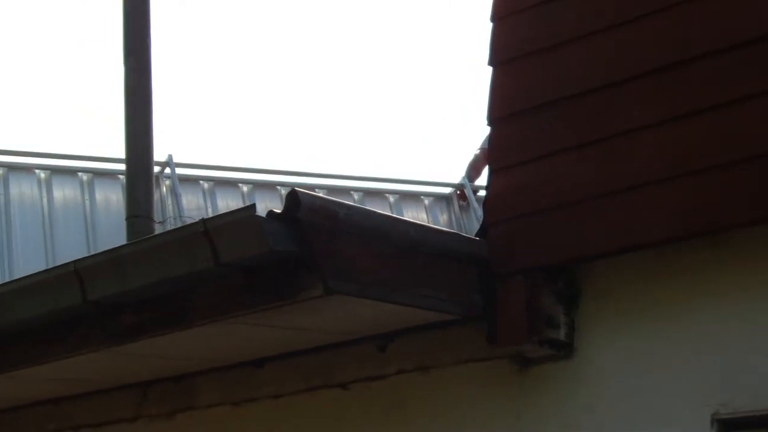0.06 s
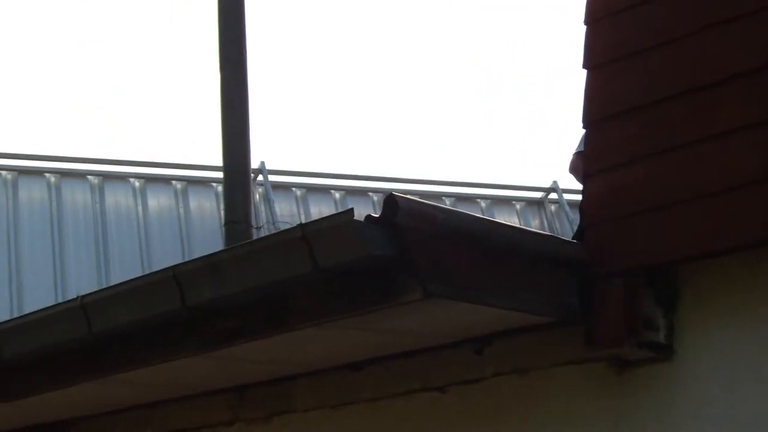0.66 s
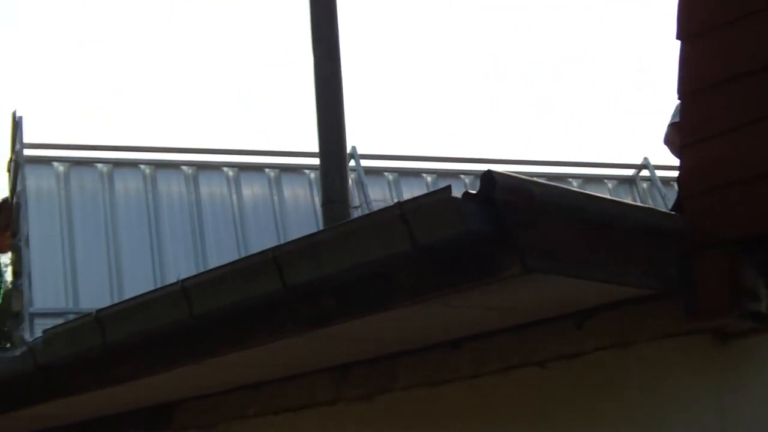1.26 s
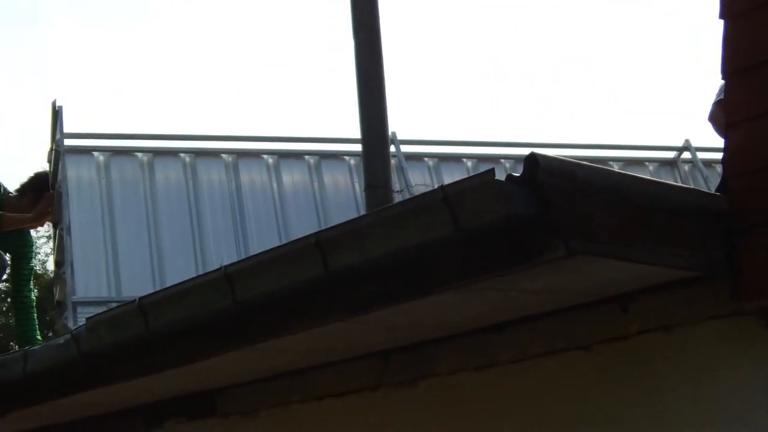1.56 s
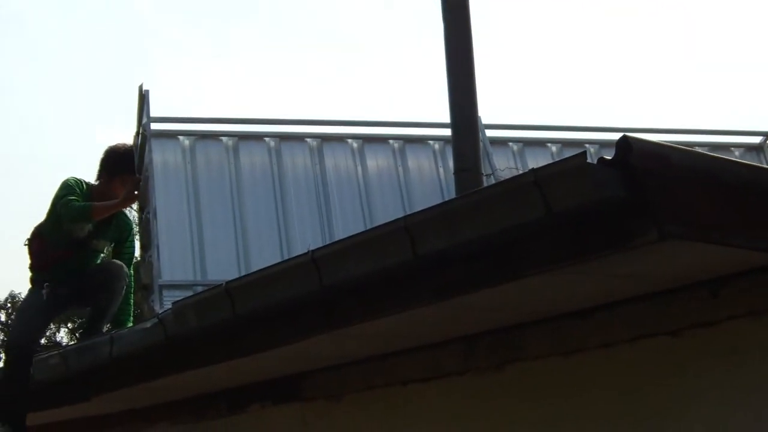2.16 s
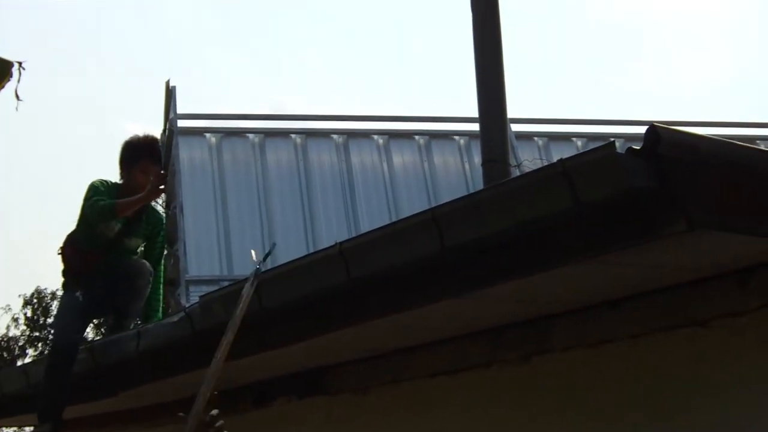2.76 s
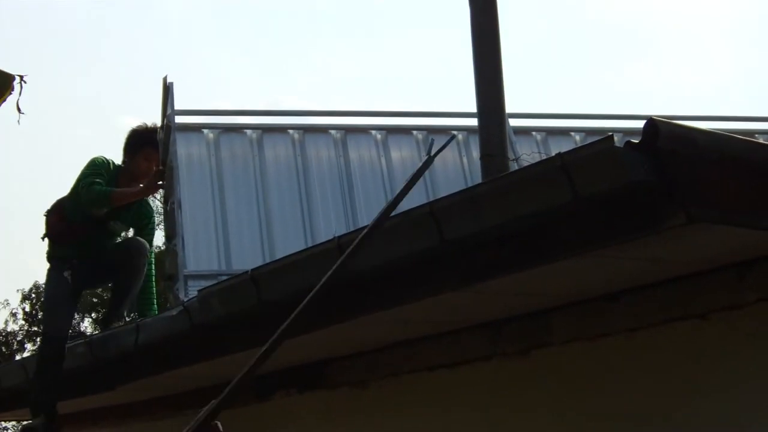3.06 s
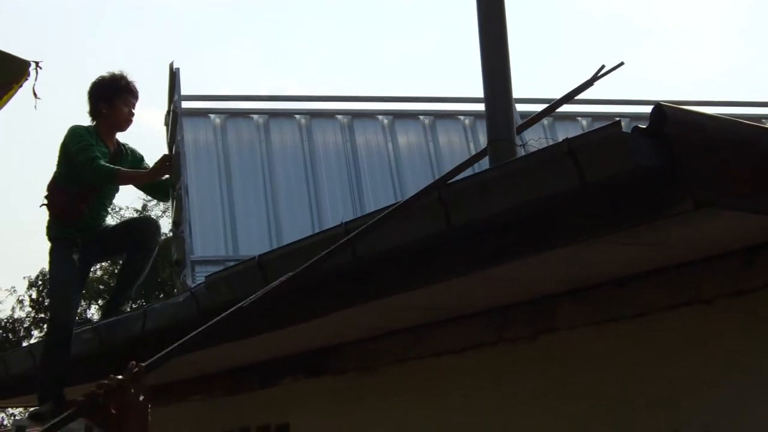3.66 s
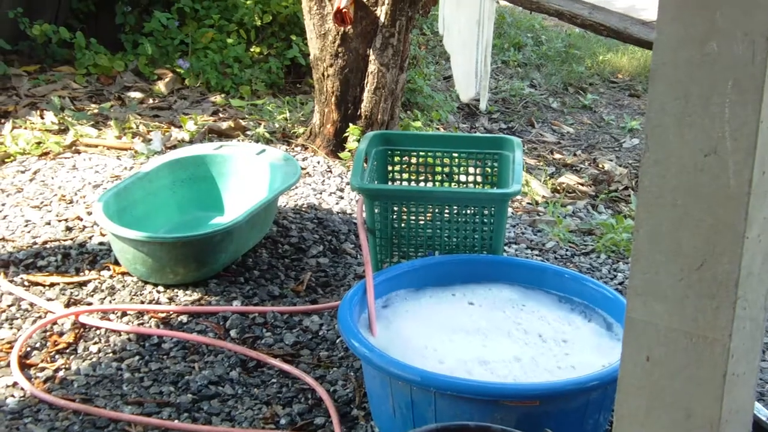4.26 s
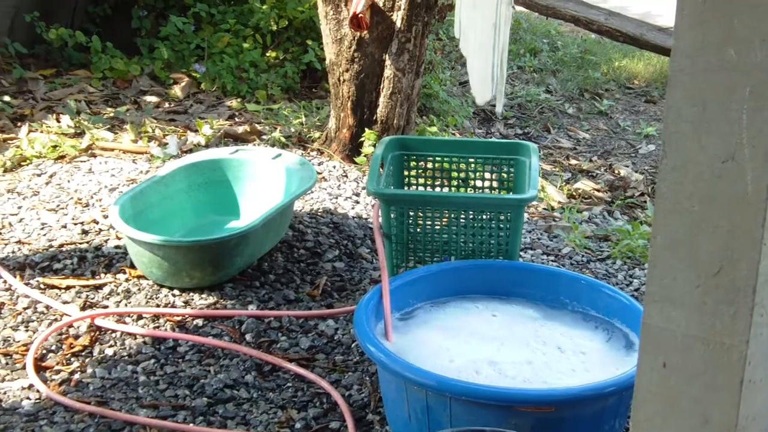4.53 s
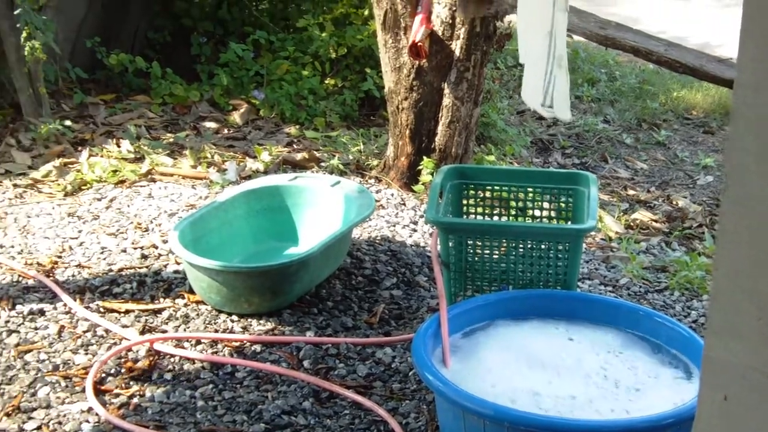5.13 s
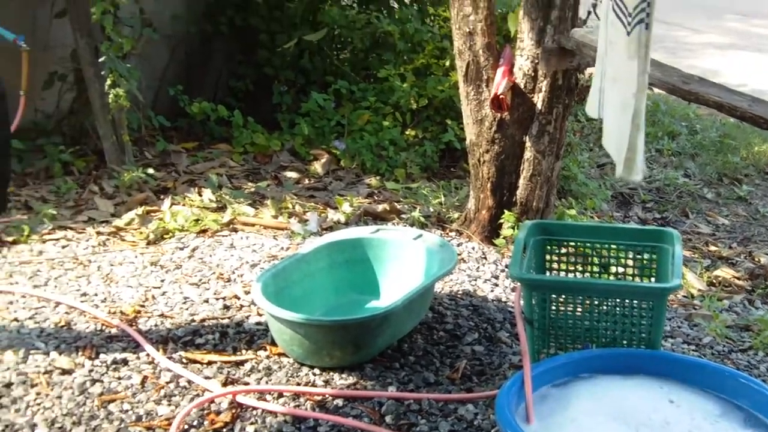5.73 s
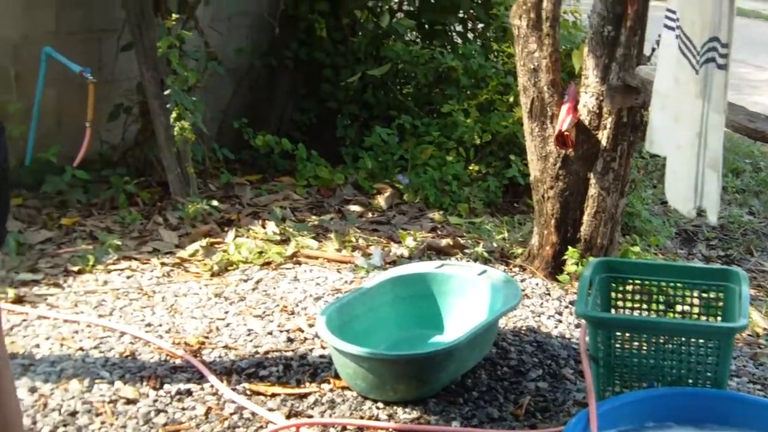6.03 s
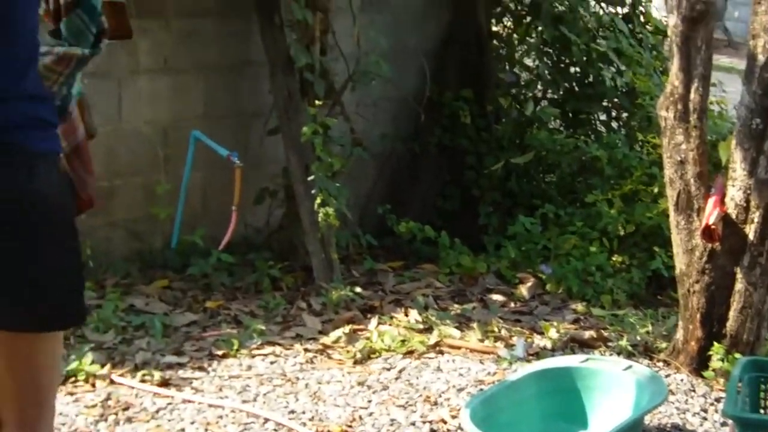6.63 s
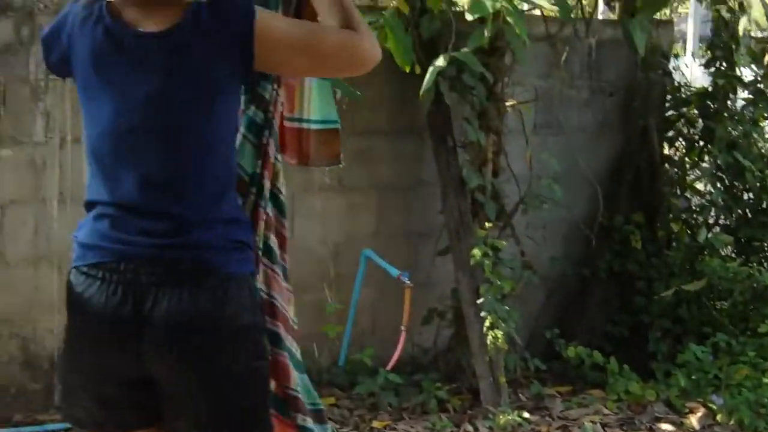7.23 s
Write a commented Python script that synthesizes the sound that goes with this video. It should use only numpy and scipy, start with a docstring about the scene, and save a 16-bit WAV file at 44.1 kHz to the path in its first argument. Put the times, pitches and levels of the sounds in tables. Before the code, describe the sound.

Corrugated metal sheets are shoved and tapped on a roof, each blow rattling and ringing briefly, while a small bird whistles four times. The taps quicken and end in two loud crashes. After a split second of silence, a small engine is running in a yard, labouring with sharp exhaust barks before settling into an even putter. A few light, dry rustles sound near the microphone over a low outdoor rumble.

```python
"""On a roof, corrugated metal sheets are knocked and shifted, ending in two loud crashes. Each blow
makes them rattle against each other and ring, while a small bird whistles four times.
After a short silence, a small engine runs in a yard. Each firing puffs through the exhaust and shakes
the casing: it labours with sharp barks at first, then settles into an even putter.
A few light rustles sound nearby."""
import sys
import numpy as np
from scipy import signal
from scipy.fft import rfft, irfft, next_fast_len
from scipy.io import wavfile
from scipy.ndimage import uniform_filter1d

SR = 44100
rng = np.random.default_rng(int(sys.argv[2]) if len(sys.argv) > 2 else 0)


def to_wav(s):
    """Save 16-bit WAV."""
    ch = np.atleast_2d(s).T  # columns
    pcm = np.round(np.clip(ch, -1, 1) * 32767)  # PCM
    wavfile.write(sys.argv[1], SR, pcm.astype(np.int16))


N = 321489
T = np.arange(N) / SR
YARD_STARTS_S = 3.9


# The tone of the sheets. Each row: frequency in Hz, relative level in dB.
SHEET_TONE = [(40, -14.5), (110, -18), (200, -16.5), (310, -14), (560, -6.5), (850, -6), (1150, -3),
              (1500, -3.5), (2240, -1.5), (3430, -3), (5150, -8), (6430, -8.5), (7200, -18.5)]

def metal_sheets(contacts_per_s=1800, crack_s=.0011, wash_s=.048, body_hz=720):
    """Each blow sets the sheets rattling against each other; every contact cracks and makes them ring."""
    t, out = T[:int(SR * .6)], np.zeros(N)
    modes = sheet_modes(t)
    for start, db, force, impact, bass_db, treble_db in shoves(t) + taps(t):
        ringing = rms_one(np.sign(rng.standard_normal(len(modes))) @ modes)
        # scattering from roof and walls blurs the ringing into a wash
        wash = rms_one(rng.standard_normal(len(t)) * np.exp(-t / wash_s))
        crack = rms_one(rng.standard_normal(len(t)) * np.exp(-t / crack_s))
        one_contact = ringing + from_db(6) * wash + from_db(1) * crack
        contacts = random_clicks(len(t), contacts_per_s)
        contacts[np.argmax(force)] = impact
        sound = signal.fftconvolve(contacts * force, one_contact)[:len(t)]
        # heavy blows bring out the hollow body, hard edges the treble
        tilt = [(body_hz, bass_db), (1900, 0), (6000, treble_db)]
        sound = colour(sound, [(hz, level + at_hz(tilt, hz)) for hz, level in SHEET_TONE])
        loudest = np.sqrt(uniform_filter1d(sound ** 2, size=500).max())
        add(out, start, from_db(db) * sound / loudest)
    return out


# A sheet's own ringing notes, some loud and some faint. Each row: pitch in Hz, relative level in dB.
SHEET_NOTES = [(545, 3.5), (690, -2), (810, 4), (1087, -4.5), (1560, 4.5), (1919, -4.5), (2266, 1.5),
               (2905, -3.5), (3055, 0.5), (3170, -9.5), (3334, -5), (3513, 4), (4021, 11), (4560, 8.5)]
# How long a sheet rings. Each row: pitch in Hz, seconds to fade by 60 dB.
RING_TIMES = [(200, 0.88), (800, 0.67), (2500, 0.22), (7000, 0.25)]

def sheet_modes(t, crowd_count=800):
    """A sheet rings at its own notes (its modes) among a crowd of others; one row for each."""
    note_hz, note_db = np.transpose(SHEET_NOTES)
    spread = (np.arange(crowd_count) + rng.random(crowd_count)) / crowd_count
    crowd_hz = 140 + 7200 * spread ** 1.25
    hz = np.r_[note_hz, crowd_hz][:, None]
    gain = np.r_[from_db(note_db + 3), np.ones(crowd_count)][:, None]
    decay = from_db(-60 * t / at_hz(RING_TIMES, hz))
    phase = rng.uniform(0, 2 * np.pi, hz.shape)
    return gain * decay * np.sin(2 * np.pi * hz * t + phase)


# A sheet is shoved or dropped. Each row: start in seconds, level in dB, rise time in seconds,
# hold time in seconds, bass boost in dB, treble boost in dB.
SHEET_SHOVES = [(-.01, -35, 0.0034, 0.016, 9.5, -3), (0.127, -14, 0.021, 0.028, -2, 5),
                (0.759, -18, 0.023, 0.011, -0.5, -4), (.93, -31.5, 0.013, 0.0072, 15.5, 13.5),
                (1.113, -32.5, 0.029, 0.035, 6.5, -2), (1.398, -16.5, 0.029, 0.021, 2, -9.5),
                (1.53, -21.5, 0.017, 0.0071, 0.5, 2.5), (1.638, -20.5, .008, 0.0059, 3, 1),
                (1.835, -18, .009, 0.015, 9.5, 3.5), (2.567, -30.5, .008, 0.023, 13.5, -2),
                (3.182, -4, 0.0029, 0.06, 0.5, -1.5), (3.43, -6, .005, 0.039, -3.5, -4),
                (3.564, -11.5, 0.0095, 0.027, -3, -11.5), (3.691, -21.5, 0.036, 0.14, 4, -1.5)]

def shoves(t):
    """List the big blows: the more sudden a shove, the harder its main impact."""
    blows = []
    for start, db, rise_s, hold_s, bass_db, treble_db in SHEET_SHOVES:
        force = blow_force(t, rise_s, hold_s, fall_s=.022, tail_db=-19, tail_s=.36)
        impact = 9.9 * np.exp(-rise_s / .006)
        blows.append((start, db, force, impact, bass_db, treble_db))
    return blows


# Sharp taps on a sheet. Each row: start in seconds, level in dB, hardness as a treble boost in dB.
SHEET_TAPS = [(1.247, -19.5, 12), (2.057, -29, 0), (2.204, -20, 14.5), (2.3178, -31.5, -5.5),
              (2.436, -34, -15), (2.759, -33.5, 8), (2.806, -25, 8), (2.826, -27, 9), (2.925, -20.5, 7.5),
              (2.991, -24.5, 12.5), (3.093, -17, 6), (3.125, -20, 6.5), (3.666, -20, -4.5)]

def taps(t, ticks_per_s=7, tick_db=-34.5, ticks_end_s=2.7, impact=.9):
    """List the small blows: taps and faint chance ticks from handling. Harder ones have less bass."""
    force = blow_force(t, rise_s=.005, hold_s=0, fall_s=.0037, tail_db=-27.5, tail_s=.12)
    ticks = [((slot + when) / ticks_per_s, tick_db + 6 * (loud - .5), 12 * (hard - .7))
             for slot, (when, loud, hard) in enumerate(rng.random((40, 3)))]
    ticks = [tick for tick in ticks if tick[0] < ticks_end_s]
    return [(start, db, force, impact, 1.5 - .58 * hard_db, hard_db)
            for start, db, hard_db in list(SHEET_TAPS) + ticks]


def blow_force(t, rise_s, hold_s, fall_s, tail_db, tail_s):
    """A blow builds, holds and dies away, leaving a faint, longer rattle."""
    late = np.maximum(t - rise_s - hold_s, 0)
    tail = from_db(tail_db) * np.exp(-late / tail_s)
    return np.minimum(t / rise_s, 1) * np.maximum(np.exp(-late / fall_s), tail)


def frame_thuds(relative_db=-30.5, decay_s=.13):
    """Every shove sends a short, deep rumble through the roof frame."""
    out, t = np.zeros(N), T[:SR]
    for start, db, *_ in SHEET_SHOVES:
        rumble = rms_one(band(rng.standard_normal(SR), low_hz=30, high_hz=120))
        add(out, start, from_db(db + relative_db) * rumble * np.exp(-t / decay_s))
    return out


# The engine's speed. Each row: time in seconds, firings per second.
ENGINE_SPEED = [(3.96, 40.53), (4.3, 43.02), (4.5, 41.85), (4.7, 42.55), (4.9, 42.01), (5.5, 43.39),
                (5.9, 42.94), (6.1, 44.62), (6.3, 44.11), (6.6, 44.91), (7.29, 44.93)]

def engine(first_firing_s=3.977, jitter_s=.00004):
    """Each firing sends a puff down the exhaust, shakes the casing and lets out a chuff of noise."""
    rate, = in_time(ENGINE_SPEED)
    cycles = np.cumsum(rate) / SR
    cycles -= cycles[int(first_firing_s * SR)]
    fired = np.flatnonzero(np.diff(np.floor(cycles)))   # the sample of each firing
    strength_luck, timing_luck, chuff_luck = rng.standard_normal((len(fired), 3)).T
    # a weak firing tends to be followed by a strong one
    seesaw = -.5 * (-1) ** np.floor(cycles[fired])
    strength = 1 + by_load(.044, .04)[fired] * (seesaw + .4 * strength_luck)
    jitter = (timing_luck * jitter_s * SR).astype(int)
    firings, chuffs = np.zeros((2, N))
    firings[np.clip(fired + jitter, 0, N - 1)] = strength
    chuffs[fired] = from_db(by_load(3.5, 2.5)[fired] * np.tanh(chuff_luck))
    # the silencer's boom shows how hard the engine works
    boom_db, = in_time(BOOM_LEVEL)
    effort_db = boom_db - boom_db[T > YARD_STARTS_S].mean()
    return exhaust(firings) + hum(cycles, effort_db) + clatter(chuffs, effort_db) + barks(rate, fired)


# The tone of one exhaust puff. Each row: frequency in Hz, relative level in dB.
PUFF_TONE = [(150, -39.5), (255, -25.5), (296, -0.5), (342, 7), (390, 3), (440, -1), (485, -6), (540, 13),
             (585, 6), (630, -4), (680, -2), (770, -28.5), (1300, -21.5), (2500, -52)]
# The silencer's boom. Each row: time in seconds, relative level in dB.
BOOM_LEVEL = [(3.97, -37), (4.22, -26), (4.48, -24), (4.9, -30), (5.27, -27), (5.47, -22), (5.7, -31),
              (6.0, -33.5), (6.27, -22), (7.29, -30.5)]
# The tailpipe's ring. Each row: time in seconds, relative level in dB.
PIPE_LEVEL = [(3.97, -27.5), (4.65, -38.5), (4.85, -31), (5.55, -31), (6.0, -40.5), (6.35, -23),
              (7.29, -23.5)]

def exhaust(firings, split_hz=455):
    """The low part of each puff booms in the silencer; the high part rings in the tailpipe."""
    direct = fade(middle_s=5.235, length_s=.52)   # at first the sound arrives by way of the yard walls
    puffs = pipe_pop(firings * direct) - colour(firings, PUFF_TONE)
    lows = signal.sosfiltfilt(signal.butter(3, split_hz, fs=SR, output="sos"), puffs)
    boom = from_db(in_time(BOOM_LEVEL)[0] - 2.5) * levelled(lows)
    ring = from_db(in_time(PIPE_LEVEL)[0] - 4.5) * levelled(puffs - lows)
    sound = boom + ring
    return direct * sound + (1 - direct) * between_walls(sound)


def pipe_pop(firings, centre_hz=480, delay_s=.0013):
    """The bare pressure pulse heard straight from the pipe: one short hump between two dips."""
    from_middle = np.pi * centre_hz * (T[:256] - delay_s)
    pulse = (1 - 2 * from_middle ** 2) * np.exp(-from_middle ** 2)
    pulse /= np.abs(rfft(pulse)).max()
    return from_db(-4) * np.convolve(firings, pulse)[:N]


# Runs of hard firings. Each row: start in seconds, number of barks, firings from one bark to the next,
# peak level in dB before echoes.
HARD_FIRINGS = [(3.966, 1, 1, -12.5), (4.264, 2, 3, -25), (4.382, 4, 2, -10), (4.572, 2, 2, -4.5),
                (4.666, 3, 3, -8.5), (4.975, 2, 2, -11), (5.302, 3, 3, -10), (5.535, 2, 3, -12)]
# The tone of a bark. Each row: frequency in Hz, relative level in dB.
BARK_TONE = [(150, -21), (400, 8), (1200, -1.5), (2400, 9), (3500, -2), (4700, -3.5), (7000, -9.5)]

def barks(rate, fired, crack_s=.0019, faint_db=-19.5, faint_end_s=5.62):
    """A hard firing is a sudden pressure jump with a burst of noise that shakes the casing."""
    out, t = np.zeros(N), T[:2048]
    hard = [(first + k * every / rate[int(first * SR)], db)
            for first, count, every, db in HARD_FIRINGS for k in range(count)]
    # while the engine labours, ordinary firings bark faintly too
    faint = [(start, faint_db + 3 * rng.uniform(-1.1, 1))
             for start in T[fired] if YARD_STARTS_S < start < faint_end_s]
    for start, db in hard + faint:
        burst = .28 * rng.standard_normal(len(t)) * np.exp(-t / crack_s)
        burst[0] = -1   # the pressure jump
        burst += from_db(3.5) * casing_ring(burst)
        sound = colour(burst, BARK_TONE + [(9000, -46.5)])
        add(out, start, from_db(db) * sound / np.abs(sound).max())
    return echoes(out, wet_db=-6, decay_s=.012)


# The tone of the engine's moving parts. Each row: frequency in Hz, relative level in dB.
CLATTER_TONE = [(100, -6.5), (250, 2), (450, 1), (650, 4.5), (770, -1), (900, 3.5), (1250, 3), (1450, 1.5),
                (1750, 2), (2600, -0.5), (3000, -5), (4200, -7), (6200, -7.5), (7200, -19)]

def clatter(chuffs, effort_db, chuff_s=.0016, hiss_hz=3000):
    """Mechanical noise swells with every firing and rings in the casing."""
    swell = signal.lfilter([1], [1, -np.exp(-1 / (chuff_s * SR))], chuffs)
    noise = rng.standard_normal(N) * (1 + swell)
    noise += from_db(by_load(1.5, -7.5)) * casing_ring(noise)
    hiss = signal.sosfiltfilt(signal.butter(2, hiss_hz, "high", fs=SR, output="sos"), noise)
    noise += (from_db(by_load(2.8, 1.4)) - 1) * hiss
    level_db = by_load(-24, -26) + .23 * effort_db
    return from_db(level_db) * levelled(colour(noise, CLATTER_TONE))


# The notes of the engine's casing. Each row: pitch in Hz, width in Hz, relative level in dB.
CASING_NOTES = [(1225, 51, 2.5), (2260, 65, -2.5), (2680, 150, -7), (3350, 210, -4), (4570, 200, -12)]

def casing_ring(shaking):
    """The casing rings at its own notes when shaken."""
    return sum(from_db(db) * resonate(shaking, hz, width) for hz, width, db in CASING_NOTES)


# The engine's lower hum note. Each row: time in seconds, level in dB.
HUM_LEVEL = [(4.0, -54.5), (4.5, -45), (4.95, -45), (5.4, -38.5), (5.8, -40.5), (6.35, -34.5), (7.29, -44)]

def hum(cycles, effort_db):
    """The engine hums at three and five times its firing rate; the higher note swells with effort."""
    third, fifth = (np.sqrt(2) * np.sin(2 * np.pi * k * cycles) for k in (3, 5))
    third_db, = in_time(HUM_LEVEL)
    fifth_db = by_load(-37, -40.5) + .61 * effort_db
    return from_db(third_db) * third + from_db(fifth_db) * fifth


def by_load(labouring, settled):
    """A setting that moves from its labouring value to its settled one as the engine calms."""
    return labouring + (settled - labouring) * fade(middle_s=5.68, length_s=.067)


# The bird's calls. Each row: start in seconds, top pitch in Hz, relative level in dB.
BIRD_CALLS = [(.168, 5090, -21.5), (0.65, 5060, -19.5), (1.217, 5115, -20), (1.844, 4780, -22)]
# The shape of one call. Each row: seconds into the call, share of the top pitch, level change in dB.
CALL_SHAPE = [(0, .68, -20), (.012, .75, -12), (.031, .82, -4), (.047, .97, -2), (.061, 1, 2),
              (.073, .92, -7), (.09, .78, -9), (.112, .66, -18)]

def bird():
    """A whistle arches up and down, smeared by echoes from the eaves and then the houses."""
    out = np.zeros(N)
    times, share, shape_db = np.transpose(CALL_SHAPE)
    t = T[:int(times[-1] * SR)]
    for start, top_hz, db in BIRD_CALLS:
        phase = 2 * np.pi * np.cumsum(top_hz * np.interp(t, times, share)) / SR
        add(out, start, from_db(db + np.interp(t, times, shape_db)) * np.sin(phase))
    near = echoes(out, wet_db=-2, decay_s=.011)
    return echoes(near, wet_db=-9, decay_s=.045, count=150)


# Light rustles. Each row: start in seconds, level in dB, fade time in seconds, middle frequency in Hz.
YARD_RUSTLES = [(4.06, -27, 0.014, 6200), (4.354, -25.5, .01, 6500), (5.21, -27.5, 0.024, 5950),
                (5.367, -25, 0.0084, 6100), (5.604, -28, 0.022, 5470), (6.206, -28, 0.087, 3600),
                (6.397, -26.5, 0.03, 5930)]

def rustles(grains_per_s=3000):
    """Many tiny clicks make brief dry crunches, as of gravel and leaves."""
    out, t = np.zeros(N), T[:SR // 4]
    for start, db, decay_s, hz in YARD_RUSTLES:
        grains = random_clicks(len(t), grains_per_s)
        crunch = rms_one(band(grains, hz / np.sqrt(2), hz * np.sqrt(2)))
        add(out, start, from_db(db) * crunch * np.exp(-t / decay_s))
    return out


# The background at the roof. Each row: frequency in Hz, relative level in dB.
ROOF_AIR_TONE = [(12, -30.5), (20, 14.5), (38, 4), (319, 0.5), (561, -2.5), (752, -6.5), (1610, 2.5),
                 (1770, -11.5), (4180, -3), (6190, -6.5), (7000, -10.5), (9100, -45.5)]
# The low rumble in the yard. Each row: frequency in Hz, relative level in dB.
YARD_AIR_TONE = [(14, -13.5), (25, 1), (36, -14), (46, -11), (60, -12), (90, -7.5), (200, -10), (400, -7.5),
                 (900, -42)]
# That rumble slowly grows. Each row: time in seconds, level in dB.
YARD_AIR_LEVEL = [(3.97, -37), (7.29, -32.5)]

def outdoor_air(tone, level_db):
    """A soft wash of outdoor background noise."""
    return from_db(level_db) * rms_one(colour(rng.standard_normal(N), tone))


def echoes(x, wet_db, decay_s, count=60):
    """Walls and ground return scattered, fading echoes."""
    delays = rng.uniform(.003, decay_s * 4, count)
    bounces = np.zeros(int(delays.max() * SR) + 1)
    bounces[(delays * SR).astype(int)] = rng.standard_normal(count) * np.exp(-delays / decay_s)
    return x + from_db(wet_db) * signal.fftconvolve(x, bounces / np.linalg.norm(bounces))[:N]


def between_walls(x, delay_s=.0075, gain=.58):
    """Sound bouncing between two walls is spread in time but keeps its tone (an all-pass filter)."""
    size = next_fast_len(N + SR)
    hz = np.arange(size // 2 + 1) * SR / size
    lag = np.exp(-2j * np.pi * hz * delay_s)
    return irfft(rfft(x, size) * (gain + lag) / (1 + gain * lag), size)[:N]


def colour(x, tone, size=8192):
    """Shape a sound with a tone table; the filter rings only after each hit (minimum phase)."""
    hz = np.arange(size // 2 + 1) * SR / size
    cepstrum = irfft(np.log(from_db(at_hz(tone, hz))))
    cepstrum[1:size // 2] *= 2
    cepstrum[size // 2 + 1:] = 0
    response = irfft(np.exp(rfft(cepstrum)))
    return signal.fftconvolve(x, response)[:len(x)]


def band(x, low_hz, high_hz):
    """Keep what lies between two frequencies."""
    return signal.sosfilt(signal.butter(2, [low_hz, high_hz], "band", fs=SR, output="sos"), x + 1e-18)


def resonate(x, hz, width_hz):
    """Ring at one pitch; a narrower width rings longer."""
    r = np.exp(-np.pi * width_hz / SR)
    feedback = [1, -2 * r * np.cos(2 * np.pi * hz / SR), r * r]
    return signal.lfilter(np.array([1, 0, -1]) * (1 - r * r) / 2, feedback, x + 1e-18)


def random_clicks(length, per_s):
    """Clicks of random size at random moments."""
    return rng.standard_normal(length) * (rng.random(length) < per_s / SR)


def from_db(db):
    """Turn decibels into a gain."""
    return 10 ** (np.asarray(db) / 20)


def rms_one(x):
    """Scale a sound so its average level (rms) is 1."""
    return x / np.sqrt(np.mean(x ** 2) + 1e-20)


def levelled(x, size=6000):
    """Hold the running level near 1."""
    return x / np.sqrt(np.abs(uniform_filter1d(x * x, size)) + 1e-4 * np.mean(x * x))


def in_time(rows):
    """Join a table's timed points into curves, one for each value column."""
    times, *columns = np.transpose(rows)
    return [np.interp(T, times, column) for column in columns]


def at_hz(rows, hz):
    """Read a table at any frequency, with octaves evenly spaced."""
    row_hz, values = np.transpose(rows)
    return np.interp(np.log(np.maximum(hz, 1)), np.log(row_hz), values)


def fade(middle_s, length_s):
    """A ramp from 0 to 1."""
    return np.clip((T - middle_s) / length_s + .5, 0, 1)


def add(out, start_s, sound):
    """Mix a sound in at its start time."""
    i = max(round(start_s * SR), 0)
    out[i:i + len(sound)] += sound[:N - i]


def scene():
    """First the roof, then the yard."""
    at_roof = metal_sheets() + frame_thuds() + bird() + outdoor_air(ROOF_AIR_TONE, level_db=-45)
    in_yard = engine() + rustles() + outdoor_air(YARD_AIR_TONE, in_time(YARD_AIR_LEVEL)[0])
    return np.where(T < YARD_STARTS_S, at_roof, in_yard)[None]


# Silences between roof and yard. Each row: start in seconds, end in seconds.
SILENT_GAPS = [(3.833, 3.846), (3.86, 3.964)]

def record(dry, ceiling=.65, cutoff_hz=7250):
    """Loud peaks are rounded, the sound drops out between the scenes, and the highest treble is cut."""
    audible = np.ones(N)
    for start, end in SILENT_GAPS:
        audible[int(start * SR):int(end * SR)] = 0
    low_pass = signal.ellip(10, .3, 70, cutoff_hz, fs=SR, output="sos")
    rounded = ceiling * np.tanh(signal.sosfilt(low_pass, dry) / ceiling)
    return signal.sosfilt(low_pass, rounded * audible + 1e-18)


dry = scene()
out = record(dry)
to_wav(out)
```